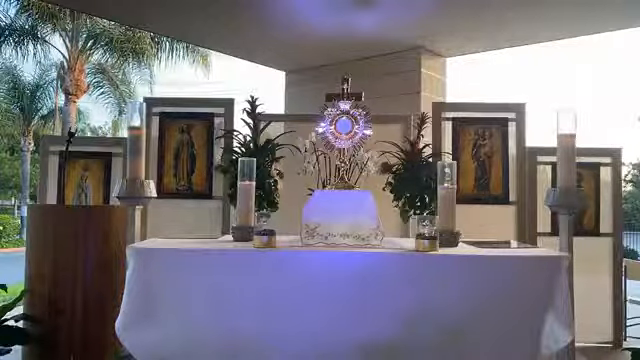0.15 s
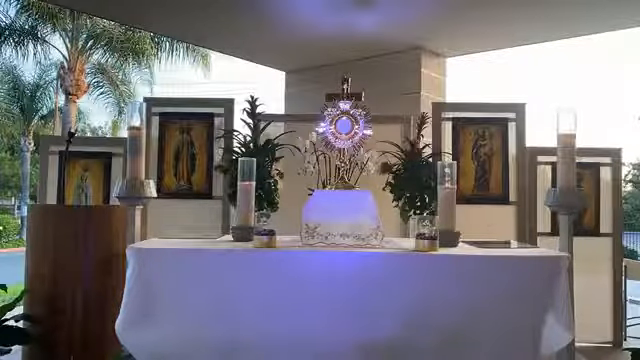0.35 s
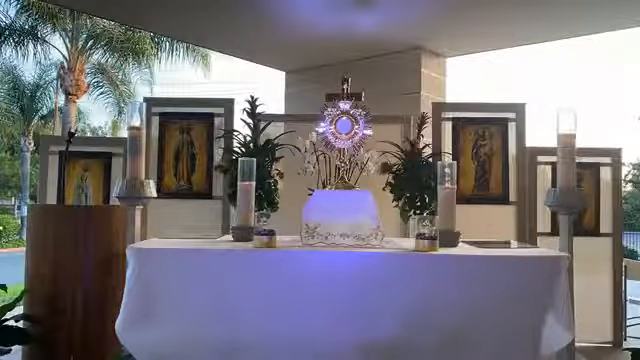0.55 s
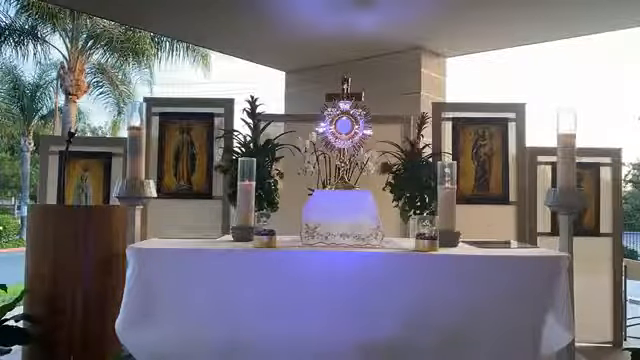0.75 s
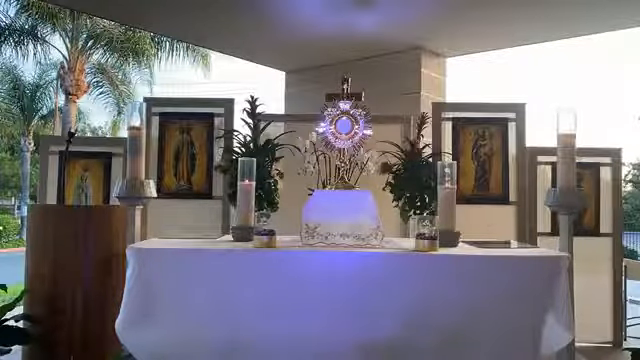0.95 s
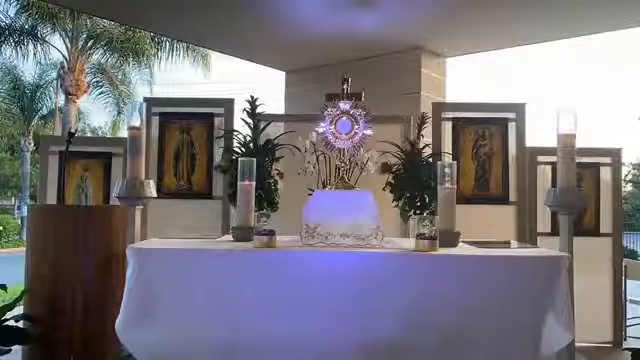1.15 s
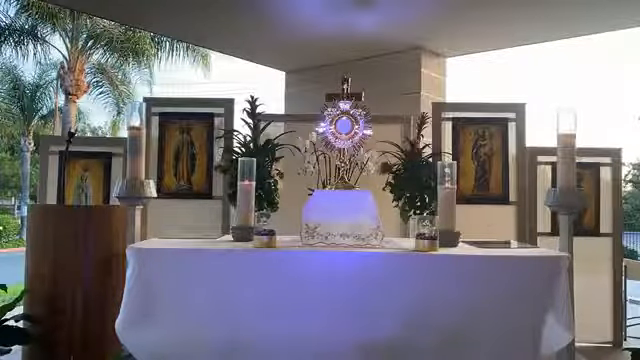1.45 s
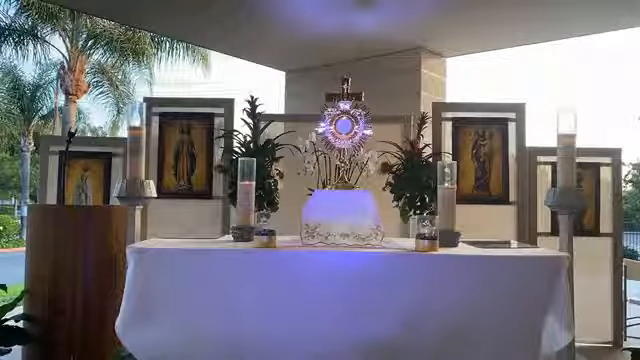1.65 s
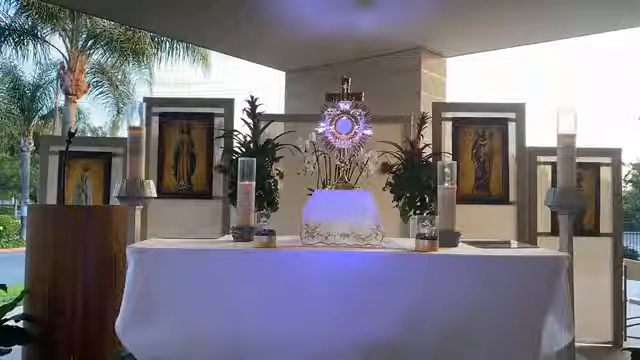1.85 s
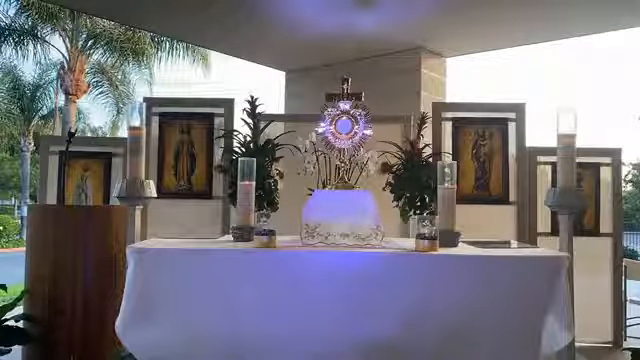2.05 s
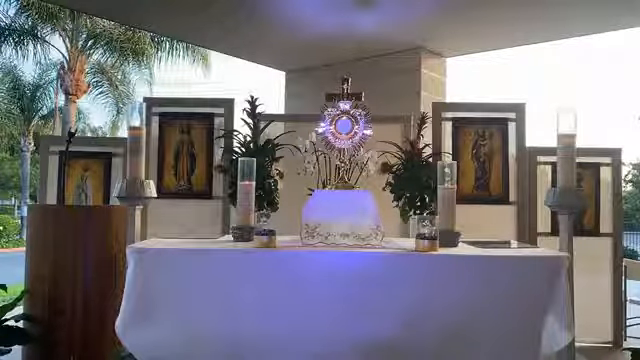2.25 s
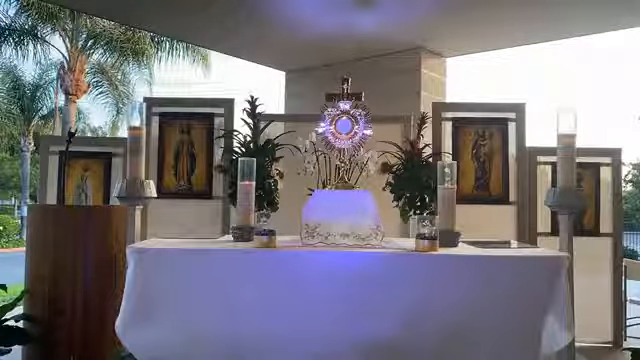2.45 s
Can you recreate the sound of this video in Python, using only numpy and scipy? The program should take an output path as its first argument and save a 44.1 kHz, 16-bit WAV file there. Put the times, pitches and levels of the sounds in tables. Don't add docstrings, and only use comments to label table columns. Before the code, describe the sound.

Quiet continuous traffic wash from a far road, low rumble and machinery hum beneath, a wavering faint whine standing out briefly near the end, an engine coming closer; outdoor covered porch, single microphone, almost inaudible deep wind buffeting.

```python
import sys
import numpy as np
from scipy import signal
from scipy.fft import rfft, irfft
from scipy.io import wavfile
from scipy.ndimage import uniform_filter1d

SR = 44100
rng = np.random.default_rng(int(sys.argv[2]) if len(sys.argv) > 2 else 0)


def to_linear_factor(level_db):
    exponent = np.asarray(level_db, float) / 20
    return 10 ** exponent


def materialize(psi):
    bounded = np.clip(np.atleast_2d(psi).T, -1, 1)
    quanta = np.round(bounded * 32767).astype(np.int16)
    wavfile.write(sys.argv[1], SR, quanta)


N = 114660

# frequency in Hz, density in dB per Hz.
HISS_COLOUR = [(470, -34), (800, -10), (1050, -0.5), (1300, -3.5), (1470, -2), (2100, -3), (4210, -2.5),
               (5260, -11), (15500, -42.5)]
HISS_DB = -55.5

# frequency in Hz, density in dB per Hz.
RUMBLE_COLOUR = [(20, -16), (30, -3.5), (50, -1), (100, -0.5), (220, -3.5), (300, -4), (430, -8.5),
                 (600, -4.5)]
RUMBLE_DB, RUMBLE_TOP_HZ = -58, 833

# time in seconds, firing tone in Hz, level in dB.
ENGINE_PATH = [
    (0, 184.6, -69.5),
    (.45, 184.8, -71),
    (1.0, 184.8, -65),
    (1.17, 185, -70),
    (1.4, 184.6, -63.5),
    (1.62, 183.9, -66),
    (1.8, 185.6, -62.5),
    (2.6, 184.4, -62.5),
]

# multiple of the firing tone, relative level in dB.
ENGINE_ORDERS = [(.5, -7), (1, -0.5), (1.1, -6.5)]

# frequency in Hz, level in dB, halo width in Hz, level slope in dB per second.
HUM_LINES = [(119.2, -69, 0.93, -2), (240.2, -63, 0.55, 0.36), (256.1, -63.5, 0.65, -0.5),
             (345.4, -71.5, 1, -1)]

# time in seconds, level change in dB.
MACHINE_LOAD = [(0, 0), (.45, 2), (.85, 0.5), (1.15, -1.5), (1.4, -1), (1.8, -8), (2.05, -2), (2.35, -3.5),
                (2.6, 3)]

# frequency in Hz, level in dB, width in Hz.
PORCH_MODES = [(76, -72, 4.1), (221.8, -71.5, 2.1), (325.4, -74, 11.7), (394, -74.5, 4.4),
               (484.3, -77, 5.8), (638.5, -72.5, 21), (553.6, -76, 9.4), (964, -74, 35)]

# time in seconds, pitch in Hz, level in dB.
WHINE_PATH = [(0, 707, -70), (.2, 707, -69.5), (.5, 704, -70.5), (.7, 711, -67.5), (.9, 710, -66.5),
              (1.12, 718, -72), (1.27, 716, -68), (1.6, 712, -67), (1.8, 722, -80), (1.89, 717, -61.5),
              (2.0, 715, -78), (2.35, 709, -70), (2.6, 708, -79)]
TONE_WAVER_DB, TONE_WAVER_HZ = 1.7, 0.64

# time in seconds, level in dB.
BREEZE_LEVEL = [(0.0, -49), (.36, -43.5), (0.5, -44), (0.67, -30), (.8, -36.5), (.92, -39), (1.03, -36.5),
                (1.2, -39), (1.36, -33), (1.44, -29.5), (1.6, -28), (1.7, -44.5), (1.83, -30), (1.98, -39),
                (2.3, -39), (2.43, -51), (2.6, -57)]

# frequency in Hz, density in dB per Hz.
BUFFET_COLOUR = [(1, -19), (3, 3.5), (6, 6), (10, -8.5), (16, -25), (22, -46), (45, -74), (90, -99)]

# centre in seconds, level in dB.
EDDY_EVENTS = [
    (0.01, -59),
    (0.55, -59),
    (1.19, -59),
    (1.42, -48.5),
    (1.69, -53),
]
EDDY_HZ, EDDY_WIDTH_HZ, EDDY_S = 21, 7.9, 0.055

# frequency in Hz, gain in dB.
MICROPHONE_TREBLE = [(4800, 0.58), (5300, -0.8), (6100, 1.1), (7300, -0.5), (10050, 2), (10130, -0.5),
                     (12000, -0.5), (12100, -1), (15500, 3)]


def rms_one(x):
    return x / np.sqrt(np.mean(x ** 2) + 1e-20)


def in_time(rows):
    seconds, *columns = np.transpose(rows)
    return [np.interp(np.arange(N) / SR, seconds, column) for column in columns]


def drift(rate_hz):
    pole = np.exp(-80 * np.pi * rate_hz / SR)
    steps = rng.standard_normal(N // 40 + 2002)
    slow = signal.lfilter([1], [1, -2 * pole, pole * pole], steps)[2000:]
    return np.interp(np.arange(N) / 40, np.arange(len(slow)), rms_one(slow))


def noise(gain_at):
    hz = np.fft.rfftfreq(N, 1 / SR) + 1e-3
    spectrum = rfft(rng.standard_normal(N)) * gain_at(hz)
    return rms_one(irfft(spectrum, N))


def colour(points):
    at, db = np.transpose(points)
    return lambda hz: to_linear_factor(np.interp(np.log(hz), np.log(at), db))


def narrow(centre_hz, width_hz):
    return noise(lambda hz: 1 / (1 + ((hz - centre_hz) / width_hz) ** 2))


def tone(hz, db):
    wavering_hz = hz + TONE_WAVER_HZ * drift(3.7)
    phase = 2 * np.pi * (np.cumsum(wavering_hz) / SR + rng.random())
    level = to_linear_factor(db + TONE_WAVER_DB * drift(11.0))
    return np.sqrt(2) * level * np.sin(phase)


def tyres():
    shape = colour(HISS_COLOUR)
    low = noise(lambda hz: shape(hz) / np.sqrt(1 + (hz / 2500) ** 8))
    high = noise(lambda hz: shape(hz) / np.sqrt(1 + (2500 / hz) ** 8))
    low_level = to_linear_factor(HISS_DB - 2.5 + 0.55 * drift(2.1))
    high_level = to_linear_factor(HISS_DB - 4.0 + 0.17 * drift(6.2))
    return low_level * low + high_level * high


def rumble():
    shape = colour(RUMBLE_COLOUR)
    roar = noise(lambda hz: shape(hz) * (hz > 10) / np.sqrt(1 + (hz / RUMBLE_TOP_HZ) ** 16))
    return to_linear_factor(RUMBLE_DB + 0.56 * drift(7.1)) * roar


def engine():
    firing_hz, db = in_time(ENGINE_PATH)
    return sum(tone(order * firing_hz, db + order_db) for order, order_db in ENGINE_ORDERS)


def hum():
    t = np.arange(N) / SR
    load_db, = in_time(MACHINE_LOAD)
    lines = np.zeros(N)
    for hz, db, width_hz, slope_db in HUM_LINES:
        core = np.sqrt(2) * np.sin(2 * np.pi * (hz * t + rng.random()))
        halo = 0.25 * narrow(hz, 3.4 * width_hz)
        lines += to_linear_factor(db + slope_db * t) * (core + halo)
    return to_linear_factor(load_db - 0.8) * lines


def porch():
    return sum(to_linear_factor(db) * narrow(hz, width_hz) for hz, db, width_hz in PORCH_MODES)


def whine():
    pitch_hz, db = in_time(WHINE_PATH)
    return tone(pitch_hz, db)


def breeze():
    db, = in_time(BREEZE_LEVEL)
    swing = noise(colour(BUFFET_COLOUR))
    power = uniform_filter1d(swing ** 2, size=SR // 6)
    spread = np.sqrt(uniform_filter1d(power, size=SR // 6))
    even_swing = swing / (spread + 0.14)
    return to_linear_factor(uniform_filter1d(db, size=SR // 20)) * even_swing


def eddies():
    t = np.arange(N) / SR
    flutter = narrow(EDDY_HZ, EDDY_WIDTH_HZ)
    even_flutter = flutter / np.sqrt(uniform_filter1d(flutter ** 2, size=SR // 10) + 0.1)
    bursts = sum(to_linear_factor(db) * np.exp(-0.5 * ((t - centre) / EDDY_S) ** 2) for centre, db in EDDY_EVENTS)
    return even_flutter * bursts


def scene():
    traffic = tyres() + rumble() + engine()
    surroundings = hum() + porch() + whine()
    wind = breeze() + eddies()
    return (traffic + surroundings + wind)[None]


def low_pass(x):
    return signal.sosfilt(signal.butter(12, 15750, fs=SR, output="sos"), x)


def record(dry):
    hz = np.fft.rfftfreq(N, 1 / SR) + 1
    mix = irfft(rfft(dry) * colour(MICROPHONE_TREBLE)(hz), N)
    return low_pass(mix)


dry = scene()
out = record(dry)
materialize(out)
```